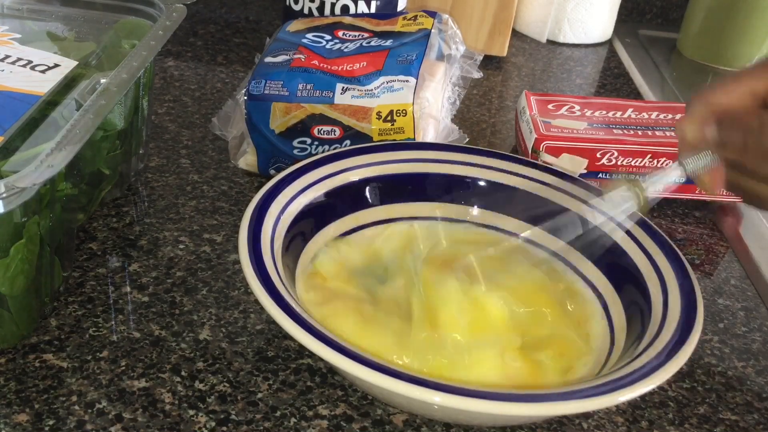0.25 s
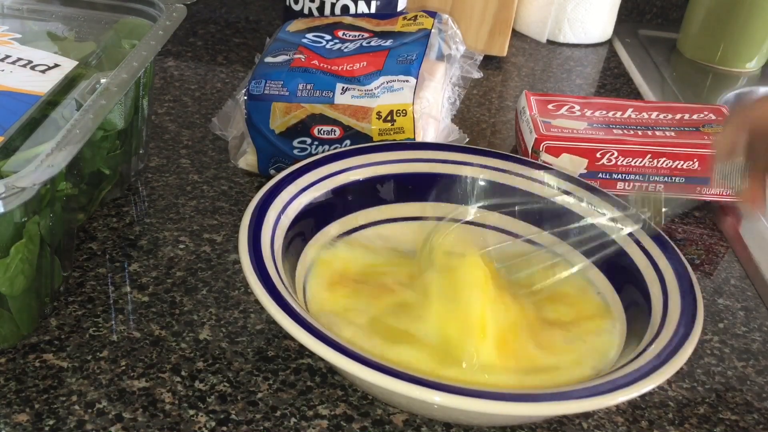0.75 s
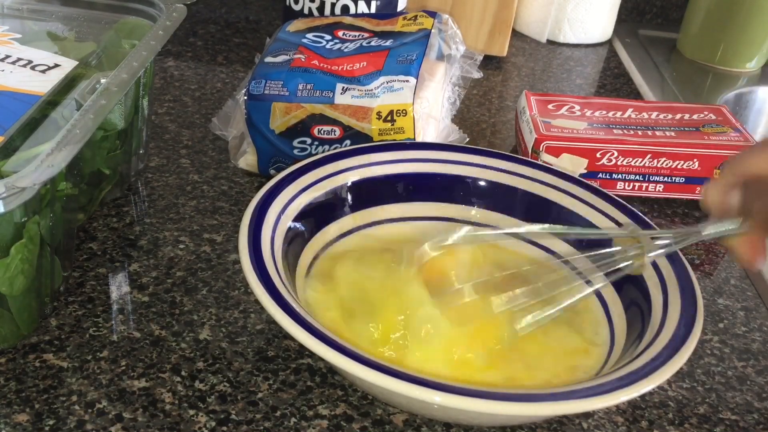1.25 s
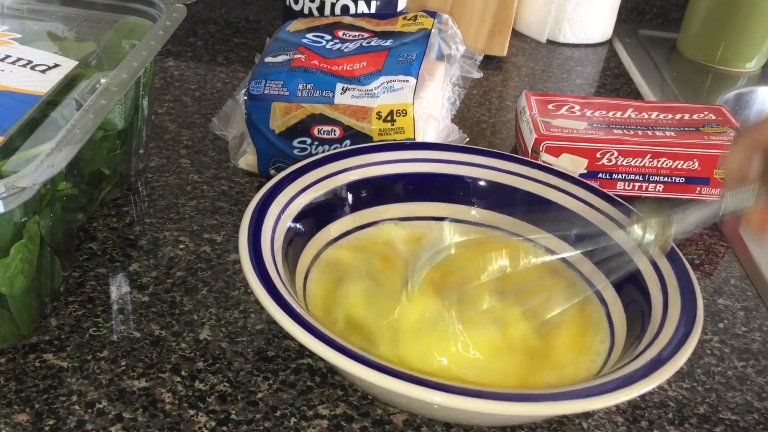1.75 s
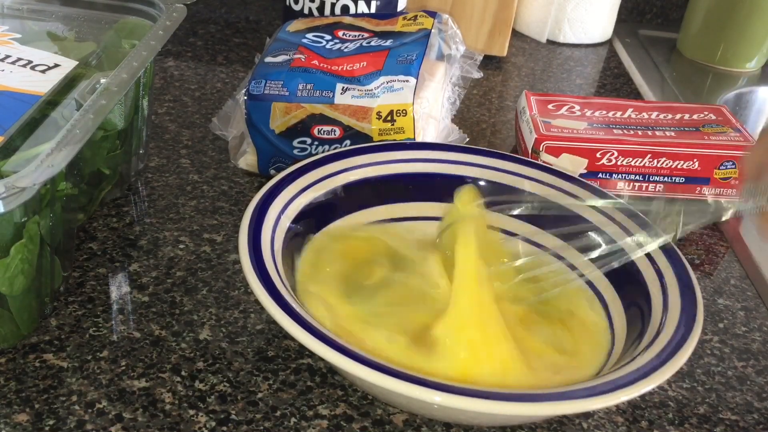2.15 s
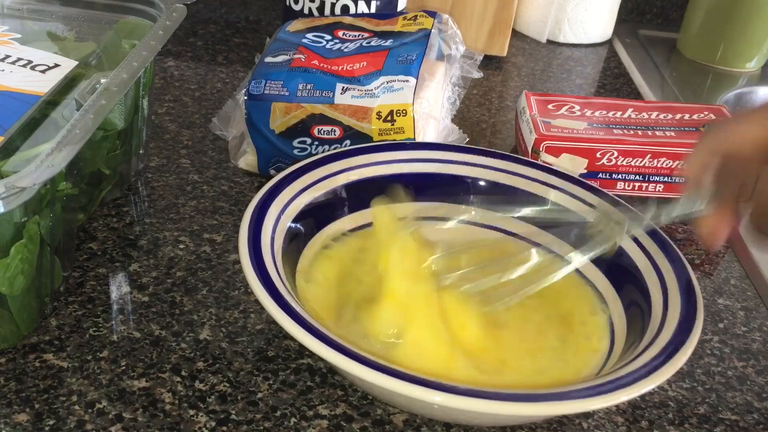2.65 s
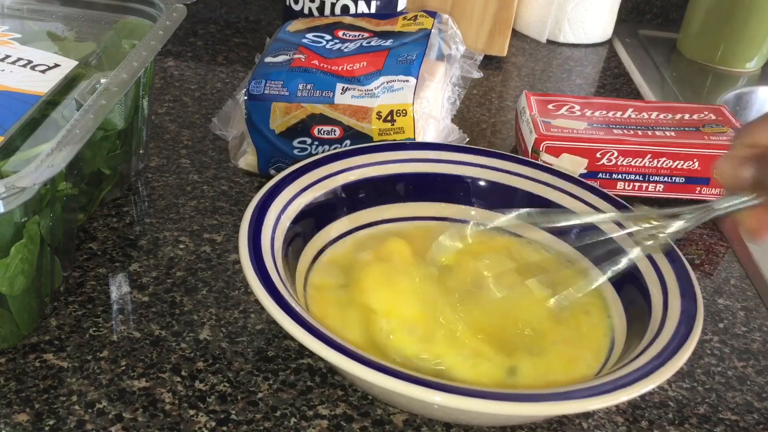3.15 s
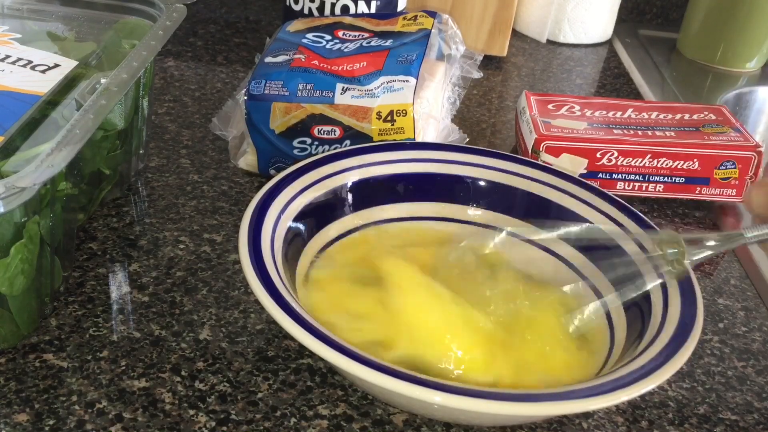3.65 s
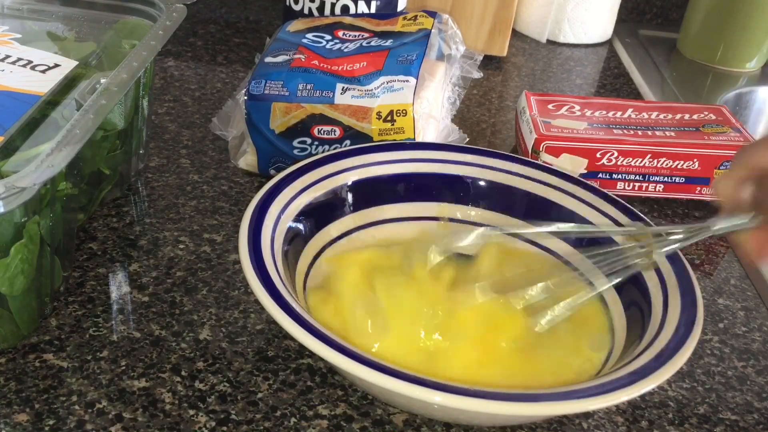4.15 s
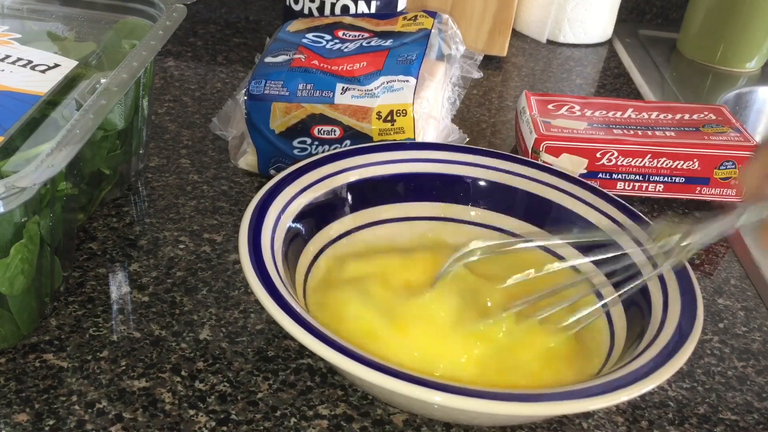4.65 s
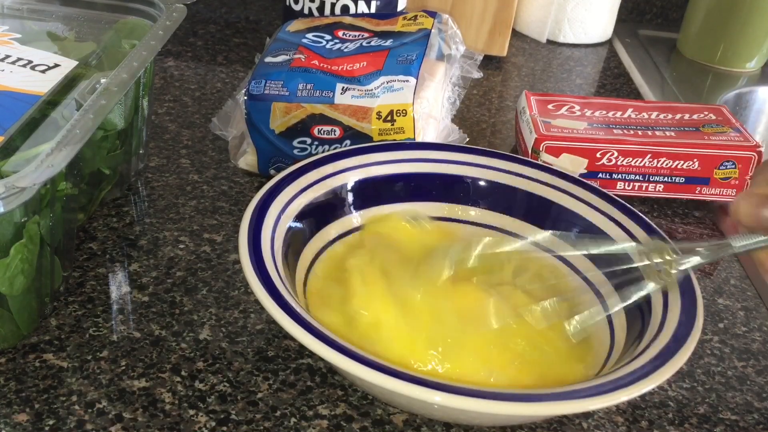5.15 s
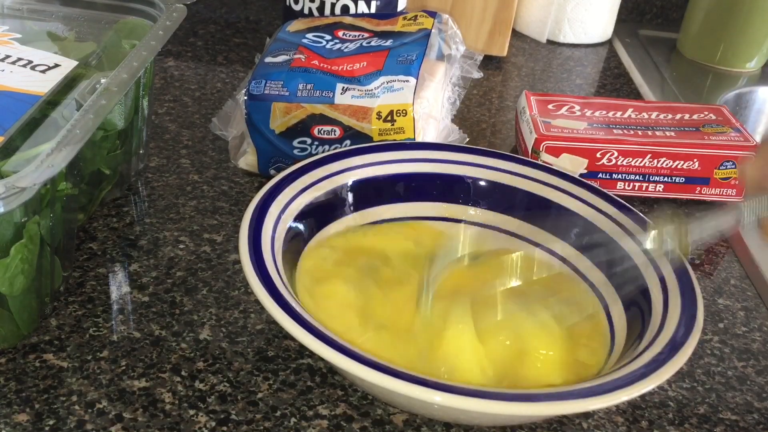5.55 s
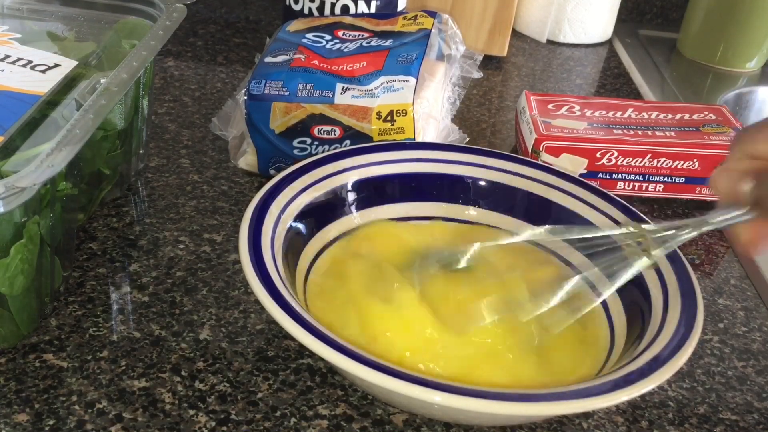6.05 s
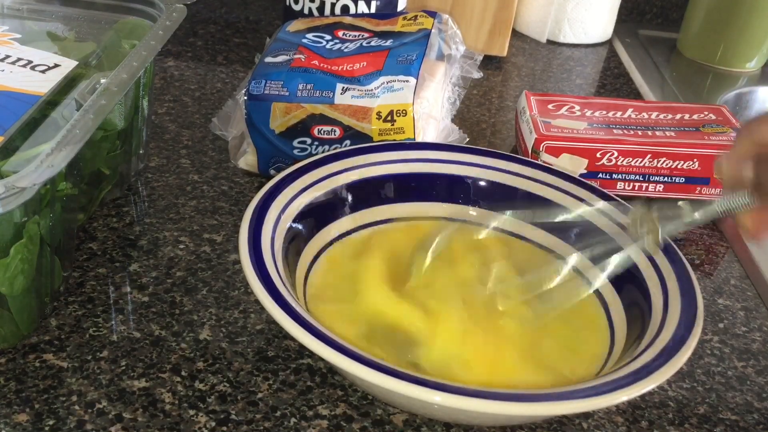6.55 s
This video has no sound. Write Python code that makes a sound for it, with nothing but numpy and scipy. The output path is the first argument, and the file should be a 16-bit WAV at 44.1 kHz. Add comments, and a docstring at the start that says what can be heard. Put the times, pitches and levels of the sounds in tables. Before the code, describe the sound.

Close up in a small kitchen, rapid sloppy whisking of liquid egg, metal wires ticking on a ceramic bowl, finally easing off nearly to silence.

```python
"""Over the faint hum of an appliance, a wire whisk beats eggs and milk in a ceramic bowl on a stone counter,
about six strokes a second, then slows to a stir. Shaped noise bursts make the slaps of the wires through
the liquid, gliding sines the plops, gulps and wire pings, and clumps of tiny bubbles the rustling froth.
Hard strokes chime on the bowl and rattle its foot, both as sums of dying modes; wires snap in short noise ticks.
The small kitchen answers by convolution with a dense, decaying noise echo."""
import sys
import numpy as np
from scipy import signal
from scipy.fft import rfft, irfft
from scipy.io import wavfile

SR = 44100
rng = np.random.default_rng(int(sys.argv[2]) if len(sys.argv) > 2 else 0)


def store_pcm(level_fs):
    """Save levels as 16-bit WAV."""
    pcm = np.round(np.clip(level_fs, -1, 1) * 32767).astype(np.int16)
    wavfile.write(sys.argv[1], SR, np.atleast_2d(pcm).T)


N = 299698   # samples
CUTOFF_HZ = 16100

# The whisk cuts into the egg. Each row: time of the slap in seconds, level in dB, brightness in dB per octave,
# resonance of the air pocket in Hz, lag of the trailing wires in seconds.
STROKES = [(0.008, -46.5, -3, 2030, .02), (0.104, -35.5, -1.4, 1240, .015),
           (0.287, -28.5, -2.5, 3570, 0.00058), (0.429, -32, -1, 2100, 0.005),
           (0.578, -32, -0.5, 1240, 0.0084), (0.73, -35.5, 1.5, 4300, 0.00068),
           (0.88, -28.5, -1.4, 3000, 0.00074), (1.031, -29, 1.1, 3670, 0.0015),
           (1.183, -31, -0.2, 1320, 0.00055), (1.338, -28.5, 0.1, 3580, 0.00034),
           (1.444, -33.5, 0, 4400, .0005), (1.484, -32, -1, 3400, 0.0032),
           (1.646, -27.5, 0.2, 3470, 0.00064), (1.794, -31.5, 0.9, 3250, 0.0011),
           (1.962, -31, 0.1, 3430, 0.00087), (2.112, -27, 1, 3450, 0.0078),
           (2.228, -42, -0.5, 1790, 0.0011), (2.276, -29.5, -0.5, 3250, 0.0057),
           (2.409, -43.5, 0, 2050, 0.0013), (2.441, -33, .8, 3670, 0.0053),
           (2.593, -36, -1.4, 2750, 0.0063), (2.775, -31, -0.2, 3640, 0.0012),
           (2.924, -30.5, -0.4, 3570, 0.0045), (3.085, -27, 0.5, 3630, 0.0055),
           (3.243, -30, 0, 1060, 0.0016), (3.404, -30, 1.3, 2250, 0.003), (3.571, -34.5, 0, 2520, .004),
           (3.58, -27, 3.3, 2500, 0.0012), (3.743, -26.5, 1, 6550, 0.0007), (3.906, -32.5, 0, 960, 0.0023),
           (4.076, -32, -1, 1810, 0.00077), (4.234, -27.5, -0.3, 1750, 0.0081), (4.402, -28, 0, 3050, .02),
           (4.483, -42.5, -5, 1970, .001), (4.569, -28, -1.1, 3500, 0.011), (4.722, -28, -.8, 3330, 0.0098),
           (4.881, -29.5, -0.5, 1570, 0.0017), (5.026, -44.5, -4.5, 1940, 0.0012),
           (5.057, -29.5, -0.4, 3460, 0.0051), (5.223, -29.5, -2, 2360, 0.012),
           (5.401, -24.5, 2.5, 2480, .001), (5.574, -26.5, 1.5, 4300, 0.0011),
           (5.75, -32.5, 0.4, 1027, .012), (5.935, -27, -.9, 1380, .0003), (6.036, -40, -3, 1280, .0005),
           (6.123, -47.5, 1, 1620, 0.04), (6.309, -56.5, -0.5, 6300, 0.014),
           (6.475, -53.5, 3.5, 5280, .001), (6.503, -57, -3, 2050, 0.0122), (6.576, -58.5, 0, 5600, .001),
           (6.663, -44.5, -1, 1380, 0.013)]
# After a hard stroke the bowl rocks back onto the counter. Each row: time in seconds, level in dB.
KNOCKS = [(.750, -21), (3.595, -27.5), (3.766, -40.5), (5.424, -23), (5.593, -22)]


def from_db(db):
    """Level to amplitude: 20 dB is a factor of ten."""
    return 10 ** (np.asarray(db) / 20)


def rms_one(x):
    """Scale to unit effective value."""
    return x / np.sqrt(np.mean(x ** 2) + 1e-20)


def seconds(length):
    """Sample times of a sound of the given length."""
    return np.arange(int(length * SR)) / SR


def at_hz(points, hz):
    """Interpolate every column of a table along a log-frequency axis."""
    known, *columns = np.transpose(points)
    return [np.interp(np.log(hz), np.log(known), column) for column in columns]


def band(x, low, high):
    """Band-pass filtering keeps the energy between two frequencies."""
    sos = signal.butter(2, [low, min(high, .45 * SR)], "band", fs=SR, output="sos")
    return signal.sosfilt(sos, x + 1e-18)


def resonate(x, hz, q, boost_db):
    """A resonance lifts one narrow band."""
    return x + from_db(boost_db) * signal.lfilter(*signal.iirpeak(hz, q, fs=SR), x)


def ring(t, hz, t60, phase=0):
    """A damped mode: a sine that falls by 60 dB in t60 seconds."""
    return from_db(-60 * t / t60) * np.sin(2 * np.pi * hz * t + phase)


def bubble(hz, t60, glide=0.055, onset_s=0.00041):
    """A bubble pulsates as a damped oscillator and goes slightly sharp as it nears the surface."""
    t = seconds(t60)
    return (1 - np.exp(-t / onset_s)) * ring(t, hz * (1 + glide * t / t60), t60)


def grains(size, spread_db):
    """Impulsive noise: its strength jumps at random every 16 samples."""
    strength = from_db(spread_db * rng.standard_normal(size // 16 + 1))
    return rng.standard_normal(size) * np.repeat(strength, 16)[:size]


def wander(size, count):
    """Band-limited random modulation: a smooth curve from count normal draws, with a spread near 1."""
    return signal.resample(rng.standard_normal(count), size)


def scattered(per_s):
    """Jittered arrivals at a fairly even rate: rows of time in seconds and two clipped normal draws."""
    slots = 200
    times = (np.arange(slots) + rng.random(slots)) / per_s
    draws = np.clip(rng.standard_normal((slots, 2)), -2, 2)
    return np.column_stack([times, draws])[times < N / SR]


def vigour_db(s):
    """How hard the hand works at time s sets the level of small splashes, plops and froth."""
    # Beating and then stirring. Each row: time in seconds, vigour in dB.
    vigour = [(0, 1), (5.6, -1), (5.9, -10.5), (6.4, -9), (6.8, -44)]
    return np.interp(s, *np.transpose(vigour))


def add(track, s, sound):
    """Superposition: mix a sound into the track at time s."""
    start = min(max(round(s * SR), 0), N)
    track[start:start + len(sound)] += sound[:N - start]


def background():
    """Steady tones wavering in amplitude and phase, an appliance's hum, over a rumble of coloured noise."""
    # The hum. Each row: frequency in Hz, rms level in dB before wavering.
    hum_tones = [(59.5, -60.5), (118.6, -58.5)]
    # Spectral colour of the room's still air. Each row: frequency in Hz, relative level in dB.
    air_colour = [(20, -32), (40, -8), (60, 0), (120, -3), (200, -14), (400, -19), (800, -26), (4000, -29),
                  (16000, -40)]
    t = np.arange(N) / SR
    air_db, waver_db, waver_rad = -59.5, 3.0, .8
    hum = 0
    for hz, db in hum_tones:
        amplitude = np.sqrt(2) * from_db(db + waver_db * wander(N, count=70))
        hum = hum + amplitude * np.sin(2 * np.pi * hz * t + waver_rad * wander(N, count=110))
    white = rfft(rng.standard_normal(N))
    colour_db, = at_hz(air_colour, np.linspace(1, SR / 2, len(white)))
    return hum + from_db(air_db) * rms_one(irfft(white * from_db(colour_db), N))


def splashes(pocket_db=12.5, pocket_q=11.2, spatter_db=-20.5, spatter_s=0.013, soft_hz=12000, pivot_hz=3300):
    """Impact noise: one wire grazes the surface, the rest slap in two ranks, then spatter falls.

    Air pockets colour each slap; deep strokes slosh more, and stray wires flick the surface in between."""
    # Slosh, squelch, slap, spray and fine spray. Each row: low edge in Hz, high edge in Hz,
    # rise in seconds, decay in seconds, gain in dB.
    splash_parts = [(315, 900, 0.0085, 0.0069, -2), (763, 2100, 0.00073, 0.0047, 3),
                    (2640, 3636, 0.000057, 0.001, 0.5), (5060, 11400, 0.00055, 0.00097, 1.5),
                    (9050, 20000, 0.00098, 0.0016, -1.5)]
    trailing_db = -1.5   # the trailing wires against the leading ones
    slosh_growth, full_stroke_db = 0.2, -25   # extra dB of slosh per dB of stroke above a full one
    flicks_per_s, flick_db, flick_spread_db, flick_hz = 5.9, -52, 6.5, 3300
    lead_s, lead_db, spread_db, ragged_db = .006, -19.0, 3.8, 4.5
    out, t = np.zeros(N), seconds(.09)
    graze = from_db(lead_db) * t / lead_s * (t < lead_s)
    flicks = []
    for s, size, pitch in scattered(flicks_per_s):
        level_db = flick_db + flick_spread_db * size + vigour_db(s)
        flicks.append((s, level_db, 0, flick_hz * 2 ** (.5 * pitch), 0))
    for s, level_db, tilt_db, pocket_hz, lag_s in STROKES + flicks:
        burst = resonate(grains(len(t), spread_db), pocket_hz, pocket_q, pocket_db)
        # six more narrow peaks, placed anew for each slap
        for hz in np.geomspace(1200, 11000, 6) * 2 ** rng.uniform(-.3, .3, 6):
            burst = resonate(burst, hz, q=16, boost_db=7)
        # liquid softens the contact
        burst = signal.lfilter(*signal.butter(1, min(soft_hz, .45 * SR), fs=SR), burst)
        # time since each rank landed: leading wires, then trailing wires
        after = np.maximum(t - lead_s - np.array([[0], [lag_s]]), 0)
        for k, (low, high, rise, decay, gain_db) in enumerate(splash_parts):
            ragged = from_db(spatter_db + ragged_db * wander(len(t), count=30))
            spatter = ragged * np.exp(-after / spatter_s)
            leading, trailing = (1 - np.exp(-after / rise)) * (np.exp(-after / decay) + spatter)
            slap = np.hypot(leading, from_db(trailing_db) * trailing)   # energies add
            part = band(burst * (slap / slap.max() + graze), low, high)
            part *= np.sqrt(.01 * SR / np.sum(part ** 2))   # equal energy before the gains
            if k == 0:   # slosh
                colour_db = slosh_growth * (level_db - full_stroke_db)
            else:
                colour_db = tilt_db * np.log2(np.sqrt(low * high) / pivot_hz)
            add(out, s - lead_s, from_db(level_db + gain_db + colour_db) * part)
    return out


def loops(gain_db=2.5):
    """Modal ringing: each slap excites the wire loops faintly, their pitch shifted as the hand bends them."""
    # The springy loops of the whisk. Each row: frequency in Hz before bending,
    # level in dB relative to the stroke before gain_db, ring time T60 in seconds.
    loop_modes = [(1794, -22, 0.22), (3690, -15, 0.15)]
    out, t = np.zeros(N), seconds(.2)
    for s, level_db, *_ in STROKES:
        for hz, mode_db, t60 in loop_modes:
            bend, uneven_db = rng.standard_normal(2) * [.015, 3]
            tone = ring(t, hz * (1 + bend), t60)
            add(out, s, from_db(level_db + mode_db + uneven_db + gain_db) * tone)
    return out


def bumps(rumble_low_hz=85, rumble_high_hz=230, push_db=-9.0, push_hz=150, push_t60=0.077):
    """Structure-borne sound: low damped modes of the counter, pushed by every stroke and knock.

    One dull bump is heard besides, and once the bowl shifts with a rumble."""
    # The counter under a knock. Each row: frequency in Hz, level in dB relative to the knock,
    # ring time T60 in seconds.
    counter_modes = [(88.5, -19, 0.25), (135, -40, 0.17), (220, -15.5, 0.081)]
    thud_s, thud_db, thud_hz, thud_t60_s = 4.4283, -20.5, 141, .02
    shift_s, shift_db, shift_rise_db_per_s, shift_fall_db_per_s = 3.44, -38.5, 145, 121
    out, t = np.zeros(N), seconds(.25)
    add(out, thud_s, from_db(thud_db) * ring(t, thud_hz, thud_t60_s))
    for s, level_db in KNOCKS:
        add(out, s, sum(from_db(level_db + db) * ring(t, hz, t60) for hz, db, t60 in counter_modes))
    for s, level_db, *_ in STROKES:
        onset = 1 - np.exp(-t / 0.0065)
        tone = ring(t, push_hz * 2 ** rng.uniform(-0.67, 0.86), push_t60)
        add(out, s, from_db(level_db + push_db) * onset * tone)
    since = np.arange(N) / SR - shift_s
    # rises up to the shift and falls after it
    rumble_db = shift_db + np.minimum(shift_rise_db_per_s * since, -shift_fall_db_per_s * since)
    rumble = rms_one(band(rng.standard_normal(N), rumble_low_hz, rumble_high_hz))
    return out + from_db(rumble_db) * rumble


def plops(small_ring_share=.6, small_spread_db=2.0, small_follows=0.8):
    """Damped resonance: plops of air and pings of wire, the lower ones ringing longer.

    The distinct plops and pings are placed one by one; small bubbles at random times die sooner."""
    # The most distinct plops, and pings of the whisk's wires near 3.5 kHz.
    # Each row: time in seconds, level in dB, starting pitch in Hz.
    distinct = [(.01, -32, 1998), (.083, -23.5, 2015), (.355, -29, 2490), (.431, -21.5, 956),
                (.544, -11.5, 1384), (.587, -16, 1200), (.710, -28.5, 4140), (.889, -17, 2234),
                (1.194, -13.5, 743), (1.275, -24.5, 934), (1.485, -23, 1260), (1.545, -27, 12600),
                (1.647, -10.5, 3545), (1.963, -15, 3590), (2.668, -24, 2370), (2.778, -20, 3480),
                (2.835, -29.5, 1150), (2.926, -17.5, 3600), (3.365, -31, 3000), (3.579, -17, 965),
                (3.912, -20.5, 1020), (4.031, -24.5, 1254), (4.233, -15.5, 1840), (4.247, -15, 1122),
                (4.484, -25.5, 1460), (4.736, -20, 692), (4.973, -31, 3400), (5.243, -12.5, 840),
                (6.035, -22, 1254), (6.255, -40, 2800), (6.267, -35, 1650), (6.344, -42, 1970),
                (6.408, -39, 1710), (6.516, -36.5, 2150)]
    t60_at_1khz_s, t60_slope = 0.046, -.4   # ring time of a distinct plop, and its power law over pitch
    small_per_s, small_db, small_hz, small_octaves = 12, -39, 1780, .55
    out = np.zeros(N)
    small = []
    for s, size, pitch in scattered(small_per_s):
        level_db = small_db + small_spread_db * size + small_follows * vigour_db(s)
        small.append((s, level_db, small_hz * 2 ** (small_octaves * pitch)))
    for rows, ring_share in ((distinct, 1), (small, small_ring_share)):
        for s, level_db, hz in rows:
            t60 = ring_share * t60_at_1khz_s * (hz / 1000) ** t60_slope
            add(out, s, from_db(level_db) * bubble(hz, t60))
    return out


def crackle(clumps_per_s=53.0, clump_s=0.0088, centre_hz=2300, octaves=0.77, scatter_octaves=0.452,
            size_db=12.5, gain_db=-53.5):
    """Granular sound: strands of egg tear apart in clumps of tiny bubbles, a soft, wet rustle.

    Its level follows the vigour of the hand."""
    out, count = np.zeros(N), 12   # at most this many bubbles in a clump
    cycles = 26   # length of each bubble in periods
    for _ in range(int(clumps_per_s * N / SR)):
        start = rng.uniform(0, N / SR)
        pitch, strength = rng.standard_normal(2)
        for delay, detune, size in rng.standard_normal((count, 3)):
            hz = centre_hz * 2 ** (octaves * pitch + scatter_octaves * detune)
            if 900 < hz < 14000:
                level_db = size_db * min(strength + size, 2)
                add(out, start + clump_s * delay, from_db(level_db) * bubble(hz, cycles / hz))
    return rms_one(out) * from_db(gain_db + vigour_db(np.arange(N) / SR))


def ticks(low_hz=2200, gain_db=-1.0):
    """Broadband impacts: wires snap against each other in very short, bright metal contacts."""
    # Each row: time in seconds, peak level in dB before gain_db.
    snaps = [(0.105, -14), (.3547, -31), (0.586, -8), (0.724, -19), (2.593, -11.5), (3.365, -30),
             (3.7442, -18), (3.85, -19.5), (4.427, -8), (4.5702, -9.5), (4.875, -18), (5.243, -6.5),
             (5.403, -4), (5.527, -23)]
    out, t, decay_s = np.zeros(N), seconds(.01), .00018
    for s, level_db in snaps:
        tick = band(rng.standard_normal(len(t)) * np.exp(-t / decay_s), low_hz, CUTOFF_HZ)
        add(out, s, from_db(level_db + gain_db) * tick / np.abs(tick).max())
    return out


def chimes(gain_db=-1.0, detune_share=0.0036):
    """Modal ringing of the bowl, a little higher or lower as the egg washes up its wall.

    Damping by the egg and the pressing wires cuts the ring short."""
    # A wire strikes bare ceramic. Each row: time in seconds, level in dB before gain_db,
    # share of the free ring time from 0 to 1, brightness in dB per octave.
    strikes = [(0.73, -10, 0.31, -1.4), (3.412, -24, 0.63, 0), (3.558, -25, 0.9, -0.5),
               (3.580, -24.5, 0.44, 5.5), (3.745, -21, 0.36, 0.5), (5.244, -26.5, 0.74, -20.5),
               (5.4011, -17.5, 0.35, 2), (5.573, -16.5, .7, 1.2)]
    # The bowl's wall. Each row: frequency in Hz before detuning, relative level in dB,
    # free ring time T60 in seconds.
    wall_modes = [(1056, -8, 0.025), (2472, 0.5, 0.21), (4406, -1.5, 0.17), (6647, -4.5, 0.13),
                  (8210, -22, 0.28), (9170, -6, 0.084), (12800, -31.5, 0.15), (11500, -24.5, 0.3),
                  (12160, -15, .17), (13900, -24, .17), (14600, -16, 0.23), (15440, -29, .15)]
    out, t = np.zeros(N), seconds(.3)
    for s, level_db, free, tilt_db in strikes:
        for hz, mode_db, t60 in wall_modes:
            uneven_db = 2.0 * rng.standard_normal()
            # brightness tilts about the second mode
            strength_db = level_db + mode_db + tilt_db * np.log2(hz / wall_modes[1][0]) + uneven_db
            tone = ring(t, hz * (1 + detune_share * rng.standard_normal()), t60 * free)
            add(out, s, from_db(strength_db + gain_db) * rng.choice([-1, 1]) * tone)
    return out


def knocks(gain_db=-1.5, uneven_db=6.5, contact_s=0.00046):
    """Modal impact: the bowl's foot clatters on the stone, each time on another spot, so the mode mix varies."""
    # The foot on the stone. Each row: frequency in Hz, relative level in dB, ring time T60 in seconds.
    foot_modes = [(123, -11, 0.16), (235, -6, 0.04), (365, -3.5, 0.066), (411, -5.5, 0.062),
                  (475, -21, 0.028), (560, -6, .05), (630, -3, .045), (705, -2, 0.022), (863, -1.5, 0.049),
                  (1130, 6.5, 0.014), (1326, -13, 0.055), (1800, -6, 0.014)]
    # Each knock settles in the same run of bounces. Each row: delay in seconds, relative level in dB.
    bounces = [(0, 2), (.011, -5.5), (0.035, -13.5), (.066, -14)]
    out, t = np.zeros(N), seconds(.25)
    onset = 1 - np.exp(-t / contact_s)
    for s, level_db in KNOCKS:
        for delay, bounce_db in bounces:
            clack = 0
            for hz, db, t60 in foot_modes:
                strength = from_db(db + uneven_db * rng.standard_normal())
                clack = clack + strength * ring(t, hz, t60, 2 * np.pi * rng.random())
            add(out, s + delay, from_db(level_db + bounce_db + gain_db) * clack * onset)
    return out


def glugs():
    """Cavity resonance: a hollow behind the whisk closes and its pitch climbs in a short gulp."""
    # Each row: time in seconds, peak level in dB, start pitch in Hz, end pitch in Hz, length in seconds.
    gulps = [(1.477, -24.5, 1076, 1617, 0.02), (2.477, -34.5, 850, 1720, 0.033),
             (2.506, -41, 1283, 1960, 0.035), (2.559, -37.5, 1220, 1310, 0.025),
             (4.082, -33.5, 648, 1580, 0.045), (4.795, -38.5, 1040, 1210, 0.02)]
    out = np.zeros(N)
    for s, level_db, start_hz, end_hz, length in gulps:
        hz = np.geomspace(start_hz, end_hz, len(seconds(length)))
        sweep = np.sin(2 * np.pi * np.cumsum(hz) / SR)
        add(out, s, from_db(level_db) * np.hanning(len(hz)) * sweep)
    return out


def kitchen(x, first_echo_s=0.0046, build_s=0.00033, wet_db=-2.0):
    """Diffuse reverberation from counter, tiles and cupboards, each band decaying at its own rate."""
    # Each row: frequency in Hz, level in dB before wet_db, reverberation time T60 in seconds.
    reverberation = [(123.6, -7.5, .4), (344, -2, 0.44), (655, -2.5, 0.17), (1300, -6.5, 0.31),
                     (2700, -5, .26), (4000, -11, 0.29), (7740, -11, 0.24), (14800, -12, .16)]
    t, echo = seconds(.5), 0
    edges = np.geomspace(70, 18000, 17)
    arrival = 1 - np.exp(-np.maximum(t - first_echo_s, 0) / build_s)
    for low, high in zip(edges, edges[1:]):
        level_db, t60 = at_hz(reverberation, np.sqrt(low * high))
        tail = band(rng.standard_normal(len(t)), low, high) * arrival * from_db(-60 * t / t60)
        # energy in proportion to bandwidth
        tail *= np.sqrt(2 * (high - low) / SR / np.sum(tail ** 2))
        echo = echo + from_db(level_db + wet_db) * tail
    return signal.fftconvolve(x, echo)[:N]


def scene(plop_room_db=-0.5):
    """Direct sound plus reverberation: the bowl heard close up, with its echo.

    The froth lies deep in the bowl, so its direct sound is weakened."""
    bowl_room_db, froth_direct_db = -5, -3
    strokes = splashes() + ticks() + knocks()
    froth = crackle()
    plopping = plops() + glugs()
    ringing = chimes() + loops()
    into_room = strokes + froth + from_db(plop_room_db) * plopping + from_db(bowl_room_db) * ringing
    direct = strokes + from_db(froth_direct_db) * froth + plopping + ringing + bumps()
    return (direct + kitchen(into_room) + background())[None]


def record(dry):
    """Low-pass filtering: an elliptic filter cuts the top steeply."""
    return signal.sosfilt(signal.ellip(10, .2, 80, CUTOFF_HZ, fs=SR, output="sos"), dry)


dry = scene()
out = record(dry)
store_pcm(out)
```